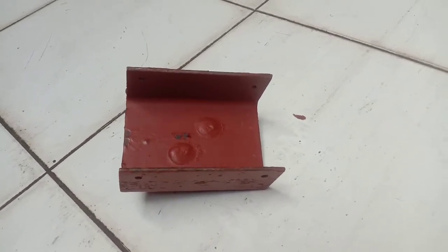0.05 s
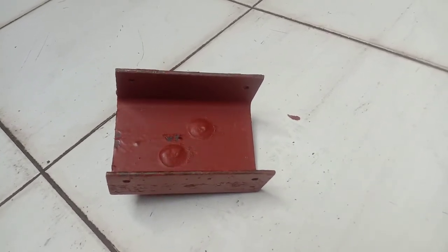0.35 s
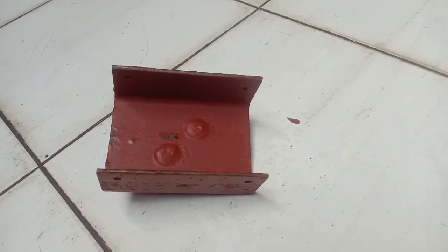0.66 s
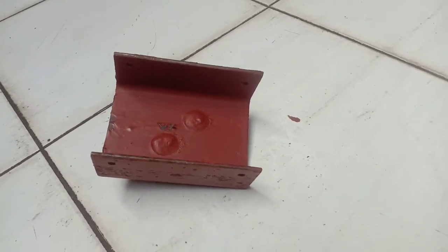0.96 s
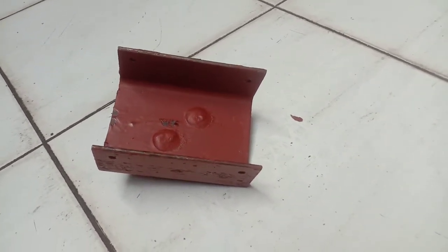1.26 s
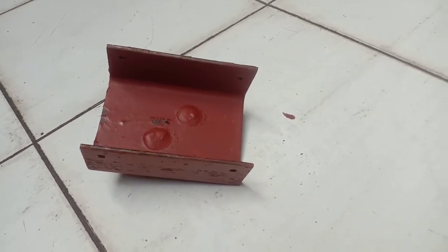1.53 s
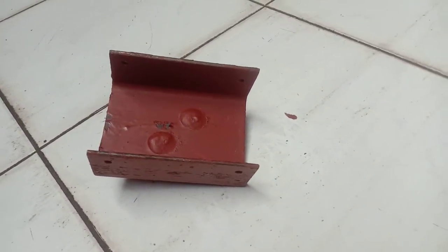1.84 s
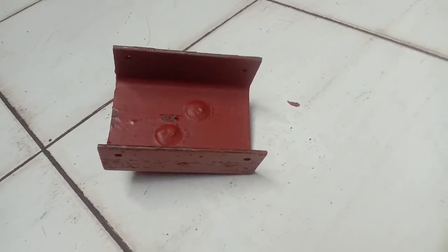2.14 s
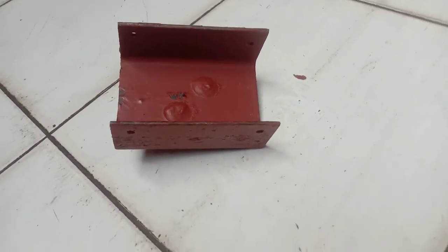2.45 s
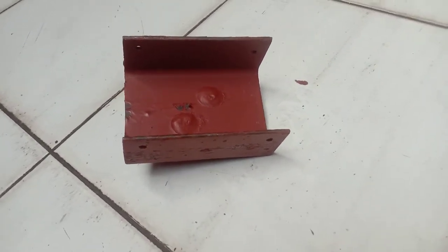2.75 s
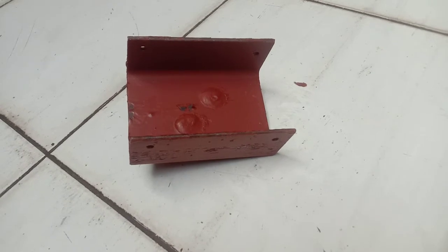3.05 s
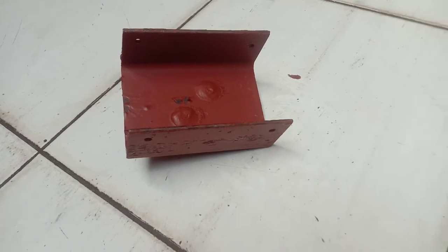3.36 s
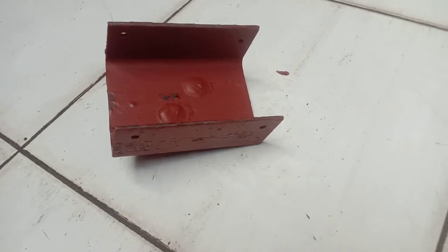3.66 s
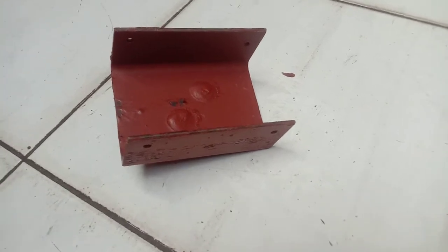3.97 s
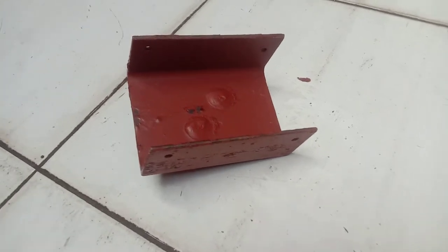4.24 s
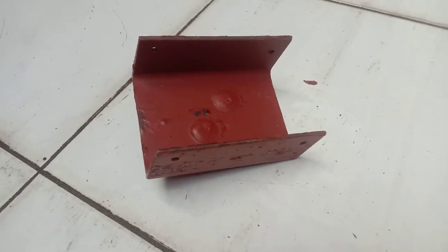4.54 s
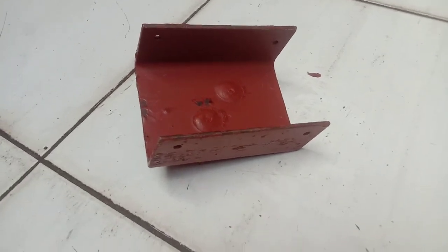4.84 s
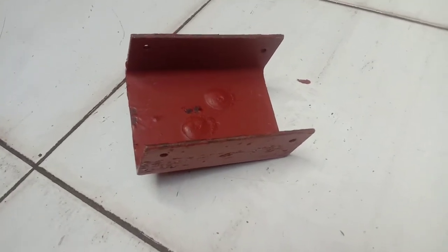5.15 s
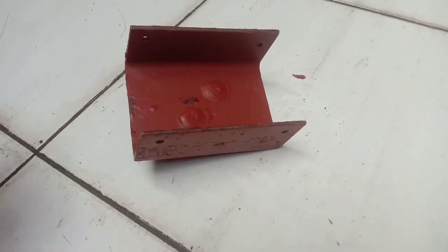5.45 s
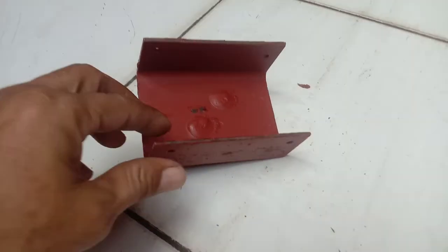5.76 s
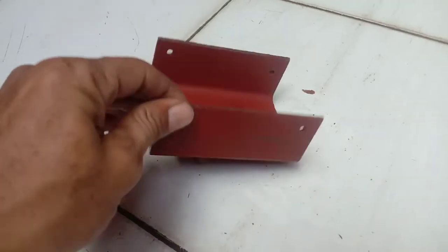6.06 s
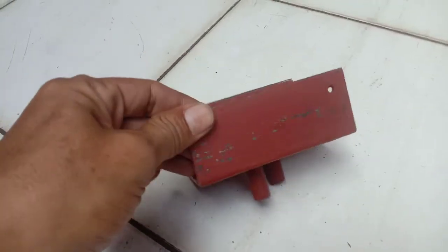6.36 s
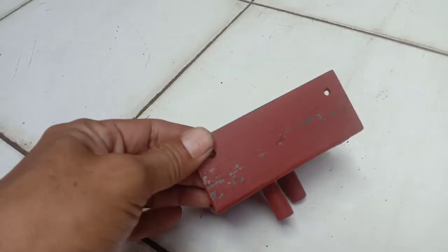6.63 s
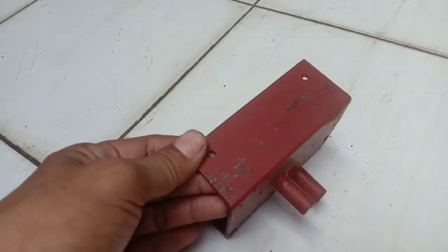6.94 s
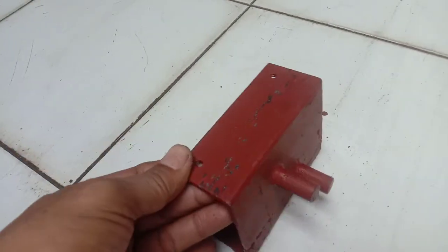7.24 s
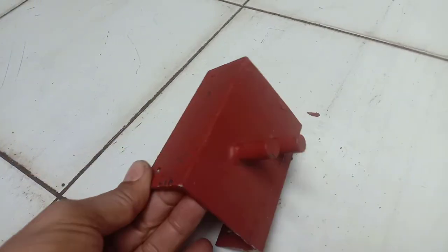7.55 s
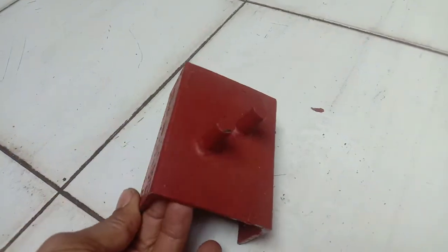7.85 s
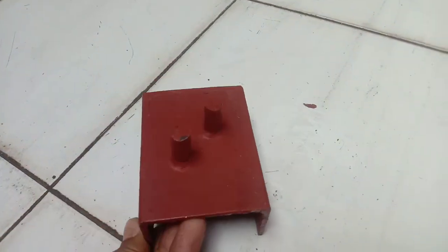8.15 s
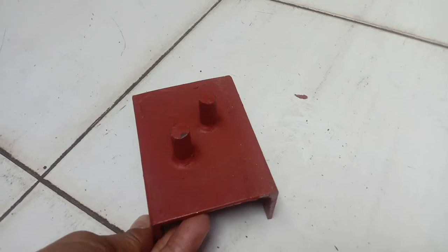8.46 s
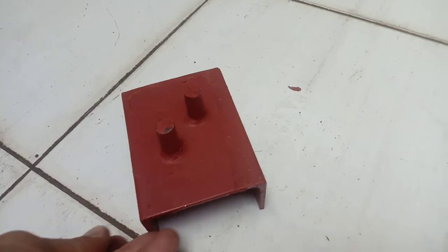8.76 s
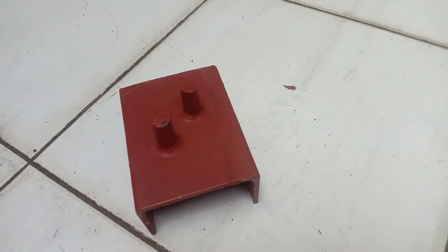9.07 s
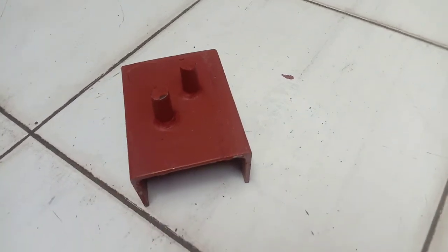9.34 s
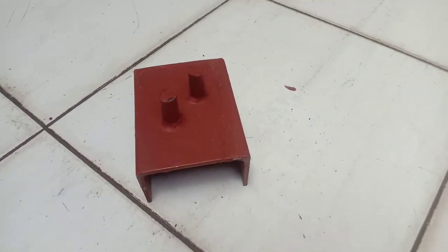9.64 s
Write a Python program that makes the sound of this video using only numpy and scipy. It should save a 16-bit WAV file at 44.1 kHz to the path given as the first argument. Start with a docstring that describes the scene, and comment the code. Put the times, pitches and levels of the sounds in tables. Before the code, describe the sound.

A single-cylinder engine thuds past outside over faint traffic rumble, booming as it swells and then fading. Close to the microphone, a steel bracket is tipped up on a tiled floor with a short clink, then turned by hand with a couple of dull knocks and faint gritty scraping. Near the end it drops with a loud, bright, ringing clank. The hard room adds a short tail over a light hiss.

```python
"""A steel channel bracket is tipped up on a tiled floor, turned by hand and let drop with a ringing clank.
Each contact clacks, thuds in the tile and rings the steel's modes; the hard room adds a short tail.
Its edges squeak by stick-slip and grind on grit. A sleeve rustles near the microphone.
Outside, a single-cylinder engine thuds past, its firing harmonics booming in exhaust and yard,
over far traffic rumble, thin tones and a faint horn. Hiss and a narrow noise band run throughout."""
import sys
import numpy as np
from scipy import signal
from scipy.fft import rfft, irfft, next_fast_len
from scipy.io import wavfile
from scipy.ndimage import uniform_filter1d

SR = 44100
rng = np.random.default_rng(int(sys.argv[2]) if len(sys.argv) > 2 else 0)


def log_audio(samples):
    """Write samples as a 16-bit WAV file to the path given in sys.argv[1]."""
    # one column per channel
    frames = np.atleast_2d(samples).T
    # limit to full scale, then quantise
    limited = np.clip(frames, -1, 1)
    pcm = np.round(limited * 32767).astype(np.int16)
    wavfile.write(sys.argv[1], SR, pcm)


N = 436590
T = np.arange(N) / SR


def amp(db):
    """dB to gain."""
    return 10 ** (np.asarray(db) / 20)


def unit(x):
    """Scale to rms 1."""
    return x / np.sqrt(np.mean(x ** 2) + 1e-20)


def read(points, hz):
    """Table value at hz, interpolated in log frequency."""
    f, value = np.transpose(points)
    return np.interp(np.log(hz + 1), np.log(f + 1), value)


def curve(points):
    """(time, value) points interpolated to every sample."""
    return np.interp(T, *np.transpose(points))


def add(mix, start_s, sound):
    """Mix a sound in at start_s."""
    start = round(start_s * SR)
    sound = sound[max(-start, 0):]
    part = mix[max(start, 0):][:len(sound)]
    part += sound[:len(part)]


def colour(x, shape_db):
    """Filter by the gain shape_db(hz)."""
    length = next_fast_len(len(x))
    hz = np.fft.rfftfreq(length, 1 / SR) + 1
    return irfft(rfft(x, length) * amp(shape_db(hz)), length)[:len(x)]


def noise(shape_db, size=N):
    """Coloured noise, rms 1."""
    return unit(colour(rng.standard_normal(size), shape_db))


def drift(per_s):
    """Random wander, rms 1."""
    knots_s = np.arange(0, N / SR + 1, 1 / per_s)
    return unit(np.interp(T, knots_s, rng.standard_normal(len(knots_s))))


def swell(start_s, length_s, rise_s, fall_s):
    """Smooth rise, hold and fall, 0 to 1."""
    ramp = np.minimum((T - start_s) / rise_s, (start_s + length_s - T) / fall_s)
    return np.sin(np.pi / 2 * np.clip(ramp, 0, 1))


def patchy(x, depth_db):
    """Random fading in small time-frequency patches, rms 1."""
    frames = signal.stft(x, nperseg=2048, noverlap=1536)[2]
    patches = uniform_filter1d(rng.standard_normal(frames.shape), size=4, axis=0)
    patches = unit(uniform_filter1d(patches, size=14, axis=1))
    return unit(signal.istft(frames * amp(depth_db * patches), nperseg=2048, noverlap=1536)[1][:N])


def grains(per_s, spread_db, size):
    """Random clicks, many small, few large; rms 1."""
    strength = amp(spread_db * np.minimum(rng.exponential(1, size), 3)) * rng.choice([-1, 1], size)
    return unit(strength * (rng.random(size) < per_s / SR))


# Traffic spectrum: f/Hz, relative density/dB
RUMBLE_SPECTRUM = [(12, -51.5), (20, -29), (37, -16.5), (46, -47), (62, -2.5), (91, 5), (177, -4),
                   (205, -10.5), (236, -18.5), (281, -25.5), (369, -25), (447, -31.5), (900, -43),
                   (1170, -123), (1980, -120)]
# Traffic envelope: t/s, level/dB
RUMBLE_LEVEL = [(0, -37.5), (5.6, -34.5), (6.3, -37), (9.9, -37)]
# Hiss spectrum: f/Hz, relative density/dB
HISS_SPECTRUM = [(400, 4), (800, 1), (1170, 1), (1350, 2), (1600, 0.5), (2100, 1.5), (3000, -3.5),
                 (5000, -11), (6100, -3.5), (7300, -30), (9000, -24.5), (13500, -29.5), (15000, -24.5),
                 (16000, -55)]


def background(hiss_db=-61, band_db=-64, band_hz=1258, band_width_hz=55):
    """Traffic rumble, thin hiss and a steady narrow noise band near 1.26 kHz."""
    rumble = patchy(noise(lambda hz: read(RUMBLE_SPECTRUM, hz)), depth_db=3.5)
    hiss = patchy(noise(lambda hz: read(HISS_SPECTRUM, hz)), depth_db=3.5)
    band = noise(lambda hz: -10 * np.log10(1 + ((hz - band_hz) / band_width_hz) ** 4))
    return amp(curve(RUMBLE_LEVEL)) * rumble + amp(hiss_db) * hiss + amp(band_db) * band


# Distant tones: t/s, length/s, level/dB, f/Hz
FAR_TONES = [(1.252, 0.12, -53, 1250), (1.6, 0.99, -68.5, 1993), (8.1, 0.39, -63.5, 2320),
             (9.038, 0.13, -55.5, 1090), (9.04, 0.12, -62, 1565), (9.479, 0.48, -59.5, 1380)]


def far_whines(width_hz=45):
    """Thin tones, blurred by echoes into narrow noise bands."""
    out = np.zeros(N)
    for start_s, length_s, db, tone_hz in FAR_TONES:
        band = noise(lambda hz: -20 * np.log10(1 + ((hz - tone_hz) / width_hz) ** 2))
        out += amp(db) * swell(start_s, length_s, rise_s=0.012, fall_s=0.088) * band
    return out


# Horn partials: f/Hz, relative level/dB
HORN_PARTIALS = [(2148, -8), (2859, -6), (3246, 6), (3580, -5)]
# Horn blasts: t/s, length/s, level/dB
HORN_TOOTS = [(.11, 0.16, -68.5), (0.637, 0.12, -61.5), (1.35, .075, -47)]


def far_horn(rise_s=0.05, echo_t60_s=0.62, blur_per_s=45):
    """Only the upper partials arrive, blurred and prolonged by echoes between houses."""
    tone, envelope = np.zeros((2, N))
    for hz, db in HORN_PARTIALS:
        paths = 1 + drift(blur_per_s) + 1j * drift(blur_per_s)
        tone += amp(db) * (paths * np.exp(2j * np.pi * hz * T)).real
    for start_s, length_s, db in HORN_TOOTS:
        attack = np.clip((T - start_s) / rise_s, 0, 1) ** 2
        envelope += attack * amp(db - 60 * np.maximum(T - start_s - length_s, 0) / echo_t60_s)
    return envelope * unit(tone)


# Cloth and microphone hiss spectrum: f/Hz, relative density/dB
CLOTH_SPECTRUM = [(1500, -4), (3000, 1), (5000, 2), (6200, 9.5), (7400, 9), (8800, -10.5), (11000, -21),
                  (13500, -21), (15000, 0), (16000, -26.5)]
# Arm moves: t/s, length/s, level/dB
SLEEVE_SLIDES = [(1.216, 0.28, -65), (3.306, 0.19, -66), (3.522, 0.15, -62.5), (3.685, 0.3, -67),
                 (4.847, 0.99, -62.5), (5.5, 0.12, -60.5), (7.103, 0.897, -58.5), (8.144, 0.71, -65),
                 (9.067, 0.59, -58.5)]


def sleeve(mic_hiss_db=-68, flutter_db=2):
    """Cloth hisses as the arm slides, over a faint steady microphone hiss."""
    envelope = amp(mic_hiss_db)
    for start_s, length_s, db in SLEEVE_SLIDES:
        envelope += amp(db) * swell(start_s, length_s, rise_s=0.42 * length_s, fall_s=0.14 * length_s)
    flutter = amp(flutter_db * drift(35))
    return envelope * flutter * patchy(noise(lambda hz: read(CLOTH_SPECTRUM, hz)), depth_db=4)


# Brief rubs, and at 9.045 s a faint distant tick: t/s, length/s, level/dB, centre f/Hz, width/octaves
RUBS_AND_TICK = [(-.08, 0.25, -53.5, 4760, 0.59), (0.351, 0.1, -56.5, 990, 0.83),
                 (1.231, 0.16, -54.5, 746, 1.8), (3.305, 0.11, -55.5, 5000, 1.6),
                 (3.533, 0.16, -51, 3660, 1), (4.486, 0.21, -48.5, 800, 1.05),
                 (4.808, 0.012, -40.5, 3530, 0.81), (5.909, 0.06, -55.5, 950, 0.51),
                 (6.651, 0.71, -58, 647, 1.05), (7.35, 1, -59.5, 475, 0.68), (8.847, 0.5, -53, 990, 0.43),
                 (9.045, 0.031, -51, 1126, 0.24), (9.143, 0.93, -55, 770, 1.12),
                 (9.369, 0.028, -48.5, 840, 0.96)]


def rubs_and_tick(top_hz=7500, catch_db=0.5, ripple_db=4, grain_db=-3):
    """Grainy bursts, each with its own resonances: brief rubs and one distant tick near 1.1 kHz."""
    out = np.zeros(N)
    for start_s, length_s, db, centre_hz, octaves in RUBS_AND_TICK:
        size = int(length_s * SR)
        ripple = np.column_stack([np.linspace(0, SR / 2, 160), ripple_db * rng.standard_normal(160)])
        grainy = rng.standard_normal(size) + amp(grain_db) * grains(250, spread_db=3.5, size=size)

        def shape_db(hz):
            band_db = -4 * (np.log2(hz / centre_hz) / octaves) ** 2
            return read(ripple, hz) + band_db - 50 * np.log2(np.maximum(hz / top_hz, 1))

        burst = colour(grainy, shape_db) * amp(catch_db * drift(70)[:size])
        add(out, start_s, amp(db) * unit(burst) * np.hanning(size))
    return out


# Clear paths, as between houses: t/s, length/s, gain/dB, upper-harmonic gain/dB
GAPS = [(0.753, 2.91, 11, 0), (1.145, 0.78, 5.5, 9), (2.605, 0.55, 4, 6.5), (3.609, 1.16, 8, 5),
        (3.922, 1.06, 0, 6.5), (4.691, 0.45, 6.5, 5.5)]


def pass_by(nearest_s=4.466, base_db=-28.5, distance_over_speed_s=0.21, shaded_db=-7.5, edge_s=0.11):
    """Engine level and upper-harmonic gain: distance sets the level, gaps in the walls lift both."""
    level_db = base_db - 20 * np.log10(np.hypot(1, (T - nearest_s) / distance_over_speed_s))
    upper_db = shaded_db
    for start_s, length_s, gain_db, upper_gain_db in GAPS:
        gap = swell(start_s, length_s, edge_s, edge_s)
        level_db += gain_db * gap
        upper_db += upper_gain_db * gap
    return level_db, upper_db


# Engine speed: t/s, firing rate/Hz
FIRING_RATE = [(.8, 28.5), (1.4, 27.7), (2.3, 27.9), (3.6, 28.4), (3.88, 29.1), (4.29, 30.7), (4.72, 33.1),
               (5, 33.6), (6, 26)]
# Exhaust spectrum: f/Hz, relative level/dB
EXHAUST_SPECTRUM = [(30, -38.5), (62, -7), (90, 3.5), (170, 2.5), (215, -5.5), (260, -11), (330, -12.5),
                    (430, -24), (560, -35), (750, -44.5), (1150, -29), (1270, -13), (1400, -31),
                    (3000, -74)]
# Exhaust and yard resonances: f/Hz, width/Hz, gain/dB
RESONANCES = [(112, 10, 11), (124.8, 4.5, 15), (161.4, 4, 18), (178, 8, 12), (258, 10, 6)]


def engine(scatter=0.074, jitter=0.0066, uneven_db=2.05, gas_db=-20, smear_rad=0.059, wall_hz=215):
    """Firing harmonics boom as they sweep through resonances and waver with shifting reflections."""
    firing_hz = curve(FIRING_RATE)
    level_db, upper_db = pass_by()
    cycles = np.cumsum(firing_hz * (1 + jitter * drift(24.94))) / SR
    pulses = np.zeros(N)
    for k in range(1, 19):
        hz = k * firing_hz
        boom = 1 + sum(amp(db) / (1 + 2j * (hz - boom_hz) / width_hz)
                       for boom_hz, width_hz, db in RESONANCES)
        # walls shade and scramble high harmonics most
        gain = amp(read(EXHAUST_SPECTRUM, hz) + upper_db / (1 + (wall_hz / hz) ** 10))
        paths = 1 + scatter * k * (drift(9) + 1j * drift(9))
        phase = 2 * np.pi * k * cycles + smear_rad * k ** 2 * rng.standard_normal()
        pulses += (gain * boom * paths * np.exp(1j * phase)).real
    puffs = 1.7 + np.exp(-(cycles % 1) / .5)  # one per firing
    gas = colour(rng.standard_normal(N) * puffs, lambda hz: read(EXHAUST_SPECTRUM, hz))
    return amp(level_db + uneven_db * drift(30)) * (unit(pulses) + amp(gas_db + upper_db) * unit(gas))


# Room decay: f/Hz, t60/s
ROOM_DECAY = [(150, 0.87), (1000, 0.46), (3000, 0.38), (7000, 0.32), (15000, 0.38)]


def room(x, tap_density=.15, onset_s=0.0043):
    """Diffuse tail off tile and plaster; treble dies first."""
    t = np.arange(SR * 3 // 4) / SR
    taps = rng.standard_normal(len(t)) * (rng.random(len(t)) < tap_density) * np.minimum(t / onset_s, 1)
    hz, frame_s, frames = signal.stft(taps, SR, nperseg=256)
    decay = amp(-60 * frame_s / read(ROOM_DECAY, hz)[:, None])
    tail = signal.istft(frames * decay, SR, nperseg=256)[1]
    return signal.fftconvolve(x, tail / np.linalg.norm(tail))[:N]


# Grinding while the bracket turns: t/s, length/s, level/dB
GRIT_SPANS = [(6.615, 0.54, -65.5), (7.176, 0.69, -69), (7.9, 0.59, -62)]


def grit():
    """Grains crack under the edge and tick in the hand-damped steel."""
    effort = sum(amp(db) * swell(start_s, length_s, rise_s=0.14, fall_s=0.115)
                 for start_s, length_s, db in GRIT_SPANS)
    tick = ring("edge", damping=8, top_hz=2200, chatter_s=.0003)
    cracks = grains(per_s=160, spread_db=5.5, size=N)
    return effort * unit(signal.fftconvolve(cracks, tick)[:N])


# Edge drags on tile: t/s, length/s, level/dB, f/Hz, width/Hz, t60/s
EDGE_DRAGS = [(6.01, 0.026, -54.5, 6440, 64, 0.28), (6.083, 0.027, -45.5, 6340, 14, 0.49),
              (7.89, 0.054, -58, 1235, 43, 0.13), (7.96, .02, -63, 6600, 70, .15),
              (8.033, 0.076, -59, 6363, 13, .3), (8.052, 0.031, -54.5, 1250, 34, .12),
              (8.128, .02, -57, 5904, 12, 0.36), (8.17, 0.077, -55.5, 1090, 57, 0.17),
              (8.335, 0.034, -52.5, 1107, 76, .1), (8.459, .022, -41.5, 6430, 250, 0.089),
              (8.484, 0.017, -26.5, 6780, 300, 0.011), (8.483, .016, -51, 10050, 250, .03),
              (8.485, .016, -46, 15100, 350, .03), (8.753, .03, -56.5, 7060, 130, 0.09)]


def squeaks(rise_share=0.38):
    """Stick-slip feeds a narrow band of the steel's modes, which decay once the edge stops."""
    out = np.zeros(N)
    t = np.arange(SR // 3) / SR
    for start_s, length_s, db, centre_hz, width_hz, t60_s in EDGE_DRAGS:
        band = noise(lambda hz: -20 * np.log10(1 + ((hz - centre_hz) / width_hz) ** 4), len(t))
        levelled = unit(band / np.sqrt(abs(signal.hilbert(band)) ** 2 + 1))
        attack = np.minimum(t / (rise_share * length_s), 1)
        decay = amp(-60 * np.maximum(t - length_s, 0) / t60_s)
        add(out, start_s, amp(db) * levelled * attack * decay)
    return out


# Floor tile modes: f/Hz, relative level/dB, t60/s
TILE_MODES = [(434, -3.5, 0.05), (504, -3.5, 0.064), (600, -1, 0.041), (728, -3, 0.033),
              (825.5, -5.5, 0.11), (1012, 1.5, .05), (1123, -14, 0.059)]


def thud(detune=.02, rise_s=0.0014):
    """Short, dull knock of the tile, tuned a little differently at each spot."""
    hz, db, t60_s = np.transpose(TILE_MODES)[:, :, None]
    t = np.arange(SR // 6) / SR
    spot_hz = hz * (1 + detune * rng.standard_normal(hz.shape))
    modes = amp(db - 60 * t / t60_s) * np.sin(2 * np.pi * spot_hz * t)
    return modes.sum(0) * (1 - np.exp(-t / rise_s))


# Contact burst spectrum: f/Hz, relative density/dB
CLACK_SPECTRUM = [(60, -63), (250, -31), (400, -15), (650, -12), (830, -10), (1000, -15), (1230, 7),
                  (1500, -6), (1900, -1), (2900, -2.5), (4100, -6), (5200, -5.5), (6800, 0.5), (8300, -18),
                  (12000, -46), (15200, -34)]


def clack(contact, top_hz, chatter_s, rise_s=0.00012, mode_db=8, mode_width_hz=40):
    """Edge chatters on tile: a noise burst coloured by the steel's modes, longer when held."""
    t = np.arange(SR // 10) / SR
    modes_hz = np.transpose(STEEL_MODES)[0][:, None]

    def shape_db(hz):
        offset_hz = abs(hz - modes_hz).min(0)
        return read(CLACK_SPECTRUM, hz) + mode_db / (1 + (offset_hz / mode_width_hz) ** 2)

    decay_s = 0.005 if contact == "free" else 0.0099
    envelope = np.minimum(t / rise_s, 1) * np.exp(-np.maximum(t - chatter_s, 0) / decay_s)
    lowpass = signal.butter(3, top_hz, fs=SR, output="sos")
    return signal.sosfilt(lowpass, noise(shape_db, len(t)) * envelope)


# Bracket modes: f/Hz, t60/s at damping 1, free level/dB, held-corner level/dB, held-edge level/dB
STEEL_MODES = [(490, .3, -42, -33, -24), (830, .27, -25, -31, -11), (921, .3, -22, -36, -19),
               (1120, .3, -19, -36, -15), (1205, .3, -18, -28, -9), (1266, .33, -13, -20, -3),
               (1480, .3, -32, -19, -21), (1680, .34, -30, -16, -16), (1793, .34, -25, -22, -17),
               (1925, .34, -24, -12, -11), (2300, .25, -31, -22, -21), (2486, .33, -22, -22, -14),
               (3363, .25, 1.5, -31, -26), (3585, .27, -17, -9, -3.5), (3896, .24, -7.5, -32, -13),
               (4052, .18, -9, -14, 3.5), (4083, .185, .5, -24, -6), (4160, .1, -14, -30, -9),
               (4440, .55, -44, -26, -19), (4539, .26, -7, -34, -24), (5421, .36, -29, -21, -22),
               (5904, .345, -4.5, -9, -19), (6283, .28, -15, -33, -28), (6363, .27, -5, 1, -15),
               (6668, .25, -15, -35, -32), (6761, .24, -6, -32, -28), (6812, .24, -13, -36, -32),
               (6930, .21, -16, -40, -34), (8050, .3, -39, -42, -26), (8280, .3, -33, -35, -25),
               (9680, .18, -36, -47, -40), (10020, .23, -33, -46, -42), (10400, .22, -37, -43, -44),
               (11262, .15, -28, -37, -42), (13030, .19, -34, -45, -42), (14783, .18, -20.5, -30, -38),
               (15300, .19, -27, -29, -30)]
# Twin modes of the two near-equal flanges: f/Hz, beat/Hz, relative amplitude
FLANGE_TWINS = [(1266, 17, .5), (3363, 12.2, .25), (4083, 10.5, .55), (4539, 8.3, .65), (6761, 14, .5),
                (6930, 19, .5), (10020, 9, .5), (13030, 21, .6)]


def ring(contact, damping, top_hz, chatter_s, hand_detune=0.00034):
    """Steel modes, weighted by contact point: slightly flat when held, some beating when free."""
    hz, t60_s, free_db, corner_db, edge_db = np.transpose(STEEL_MODES)[:, :, None]
    t = np.arange(int(SR * .6 / max(damping, 1))) / SR
    strike_db = {"free": free_db, "corner": corner_db, "edge": edge_db}[contact]
    softness_db = -10 * np.log10(1 + (hz / top_hz) ** 6)  # soft contacts drive high modes less
    decay_db = -60 * t * damping / t60_s
    held = contact != "free"
    cycles = hz * (1 - hand_detune * held) * t + rng.random(hz.shape)
    modes = np.sin(2 * np.pi * cycles)
    if not held:
        for twin_hz, beat_hz, strength in FLANGE_TWINS:
            k = np.argmin(abs(hz - twin_hz))
            modes[k] += strength * np.sin(2 * np.pi * (cycles[k] + beat_hz * t))
    return (amp(strike_db + softness_db + decay_db) * modes).sum(0) * (1 - np.exp(-t / chatter_s))


# Steel on tile: t/s, contact (edge, corner, free), ring gain/dB, decay-rate factor,
# clack gain/dB, thud gain/dB, cutoff f/Hz, chatter/s
CONTACTS = [(6.018, "edge", -57, 1.3, -63, -70, 16000, .008),
            (6.0905, "edge", -65, 1.3, -66, -73, 16000, .002),
            (6.1417, "edge", -28, 3.6, -46, -43, 6130, .0008),
            (6.149, "edge", -29.5, 2, -31.5, -41, 5500, .00065),
            (6.1503, "corner", -26.5, 1.04, -39, -64, 16000, .002),
            (6.158, "corner", -21.5, 3.5, -30, -56, 3550, .0045),
            (6.5841, "edge", -35, 5.6, -29.5, -38, 1320, .002),
            (7.1494, "edge", -32.5, 5.5, -40, -38.5, 4850, .0003),
            (7.1505, "corner", -49, 1.3, -59, -72, 15800, .002),
            (7.976, "edge", -66, 3.9, -66, -62, 7000, .001),
            (8.134, "corner", -64, 1.4, -67, -68, 16000, .001),
            (8.153, "edge", -63, 2.9, -55, -68, 16000, .001),
            (8.2232, "edge", -62, 2.7, -50, -66, 7000, .001),
            (8.2806, "edge", -37.5, 3.2, -30, -72, 1510, 0.00065),
            (8.453, "edge", -42, 1, -47, -44.5, 4000, .005),
            (8.461, "edge", -24, 3.6, -26.5, -30, 1900, .0008),
            (8.464, "edge", -32.5, 1.2, -46, -46, 9000, .004),
            (8.480, "edge", -16.5, 6.6, -21.5, -29, 1700, .001),
            (8.4865, "edge", -27, 7.7, -32, -37, 7040, .0007),
            (8.497, "edge", -22, 9, -38, -57, 7000, .001),
            (8.5135, "free", -4.5, 0.97, -3, -37, 17900, .0003),
            (8.5281, "edge", -11, 6.1, -17, -23.5, 2520, .0008),
            (8.5331, "edge", -13, 4.1, -27, -34, 7060, .0006)]


def bracket(ring_room_db=-17, clack_room_db=-6):
    """Each contact rings, clacks and thuds; the edges squeak and grind; all of it feeds the room."""
    rings, clacks = np.zeros((2, N))
    for start_s, contact, ring_db, damping, clack_db, thud_db, top_hz, chatter_s in CONTACTS:
        add(rings, start_s, amp(ring_db) * ring(contact, damping, top_hz, chatter_s))
        add(clacks, start_s, amp(clack_db) * clack(contact, top_hz, chatter_s))
        add(clacks, start_s, amp(thud_db) * thud())
    rings += squeaks()
    clacks += grit()
    return rings + clacks + room(amp(ring_room_db) * rings + amp(clack_room_db) * clacks)


def scene():
    """All sources at one microphone."""
    mix = bracket() + engine() + background() + sleeve() + rubs_and_tick() + far_horn() + far_whines()
    return mix[None]


def record(dry, threshold_db=-16, duck_share=0.8, recover_db_per_s=160, cutoff_hz=15600):
    """Gain control ducks on the loudest clank and recovers; then a low-pass."""
    power_db = 10 * np.log10(abs(uniform_filter1d(dry[0] ** 2, size=200)) + 1e-12)
    release_db = T * recover_db_per_s
    peak_db = np.maximum.accumulate(power_db + release_db) - release_db
    ducked = dry * amp(-duck_share * np.maximum(peak_db - threshold_db, 0))
    lowpass = signal.firwin(511, cutoff_hz, window=("kaiser", 9), fs=SR)
    return signal.oaconvolve(ducked, lowpass[None], "same")


dry = scene()
out = record(dry)
log_audio(out)
```